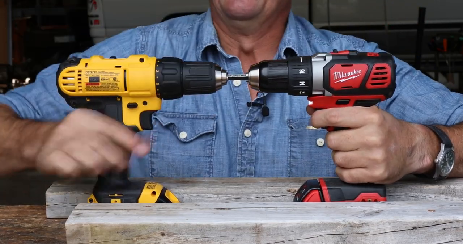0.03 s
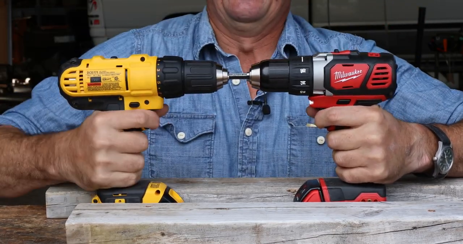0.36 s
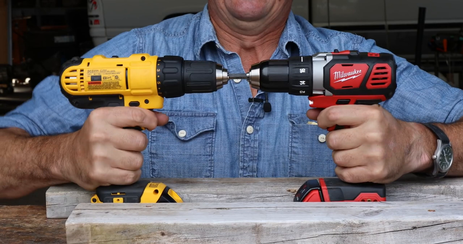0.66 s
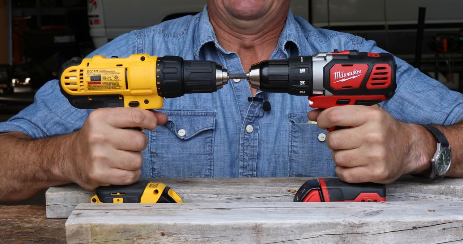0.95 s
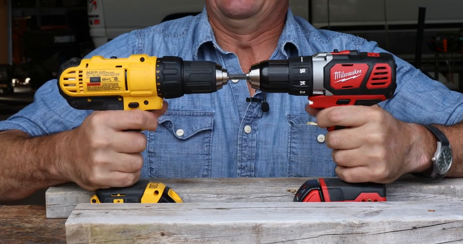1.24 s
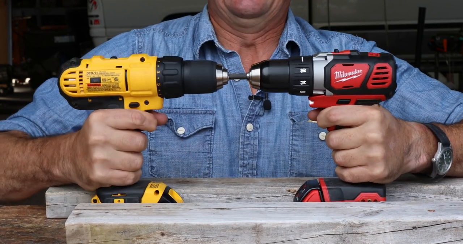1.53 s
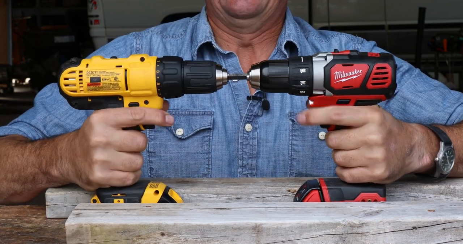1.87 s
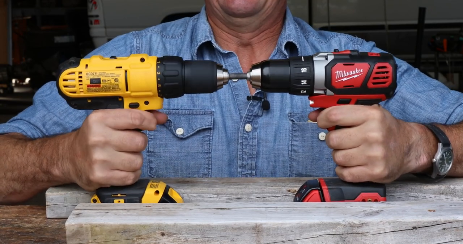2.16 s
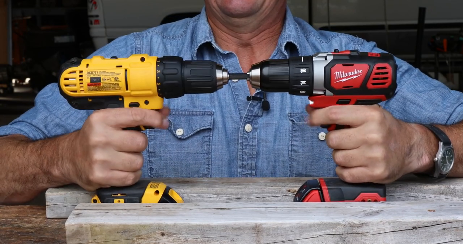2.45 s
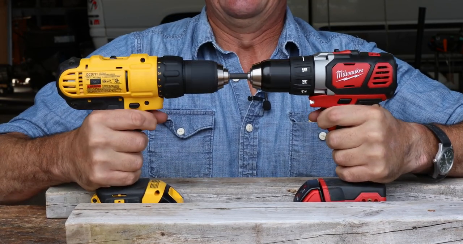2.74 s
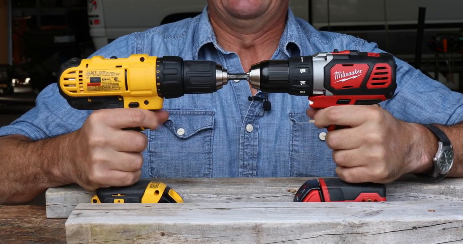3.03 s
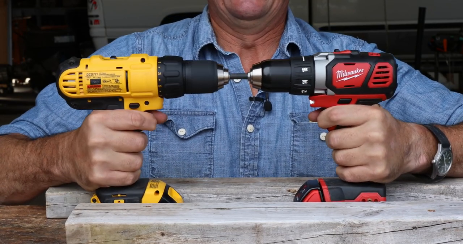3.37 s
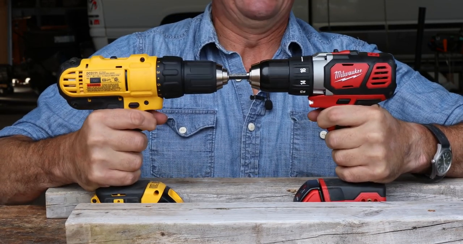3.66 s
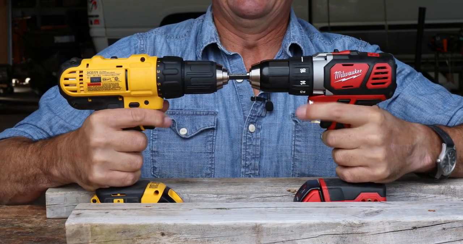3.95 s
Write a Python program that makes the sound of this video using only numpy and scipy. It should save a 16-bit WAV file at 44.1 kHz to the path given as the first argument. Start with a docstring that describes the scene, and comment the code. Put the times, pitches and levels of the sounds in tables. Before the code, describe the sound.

Close up in a workshop, cordless drills rev and stop five times after a soft handling rustle. Each burst growls and hisses with a fast ratcheting clutch rattle, surrounded by light trigger ticks, hollow knocks and a brief room ring.

```python
"""Two cordless drills, joined chuck to chuck, fight each other in five short bursts in a workshop.
Their gears grind up to speed and a slipping clutch snaps over its teeth, faster and then slower.
Triggers tick, speed controls whine, and hands and chucks (the jaws that hold a bit) knock.
The room rings on after each burst, over faint hums and the rustle of handling."""
import sys
import numpy as np
from scipy import signal
from scipy.fft import rfft, irfft
from scipy.io import wavfile

SR = 44100
rng = np.random.default_rng(int(sys.argv[2]) if len(sys.argv) > 2 else 0)


def wav_out(sig):
    """Save sig, one row per channel (or a flat mono array), as 16-bit PCM at SR to the path in sys.argv[1]."""
    wavfile.write(sys.argv[1], SR, np.round(np.clip(np.atleast_2d(sig).T, -1, 1) * 32767).astype(np.int16))


N = 176400
T = np.arange(N) / SR


def motors():
    """Gears grind and growl, brushes hiss and the drill bodies shudder, all louder with speed."""
    # motor speed, one list per burst: (time [s], speed [clutch teeth per s])
    bursts = [
        [(.535, 0.86), (.56, 7.7), (.6, 9.8), (.645, 3.9), (.675, 12.3), (.695, 29), (.745, 31.6), (.765, 13.4),
         (.785, 1.2)],
        [(1.408, 1.93), (1.445, 14.9), (1.483, 14.8), (1.497, 28.2), (1.57, 47.7), (1.645, 48.4), (1.69, 23.2),
         (1.712, 12), (1.745, 1.4)],
        [(2.135, 2.1), (2.155, 12.1), (2.19, 19.4), (2.23, 38.5), (2.29, 49.4), (2.365, 41.3), (2.398, 22),
         (2.425, 4.8)],
        [(2.765, 1.8), (2.795, 13.7), (2.83, 15), (2.845, 30), (2.9, 40.8), (2.95, 49), (2.987, 30.7),
         (3.01, 15.1), (3.035, 0.72)],
        [(3.36, 0.98), (3.398, 6.37), (3.41, 24.4), (3.46, 32.8), (3.53, 51), (3.69, 56.2), (3.745, 39),
         (3.778, 24.1), (3.805, 1.95)],
    ]
    speed = sum(np.interp(T, *np.transpose(burst), left=0, right=0) for burst in bursts).clip(0)
    effort = speed / 50  # 1 is about full speed
    gears = (gear_grind(effort) + gear_growl(speed, effort)) * effort ** 1.076
    hiss = brushes(effort)
    shaking = shudder(effort)
    sticking = from_db(2.54 * drift(67) * np.clip(1 - effort, 0, 1))  # slow gears move in fits
    return room_and_shell_rings(gears * sticking + shaking) + hiss * sticking


def gear_grind(effort):
    """Gear teeth make countless tiny hits. Slow teeth meet softly, so the treble comes in with speed."""
    # tone of the grinding: (frequency [Hz], level [dB])
    gear_colour = [(47, -35.5), (80, -24.5), (98, -36.5), (130, -13), (328, -8), (391, -1), (649, -3),
                   (1400, -3), (1910, -8), (2900, -7), (5620, -20), (7010, -18.5), (15500, -29)]
    grind = coloured(grains(4500, spread_db=3), gear_colour) * from_db(-29.5 + drift(280))
    dull = signal.sosfilt(signal.butter(1, 2540, fs=SR, output="sos"), grind)
    return dull + (grind - dull) * effort ** .36


def gear_growl(speed, effort):
    """Teeth strike in an uneven rhythm and ring the gearbox; the pitch rises with speed."""
    # gearbox rings at full speed: (frequency [Hz], width [Hz], level [dB])
    rings = [(433, 200, -3), (616, 214, 0.5)]
    teeth_passed = np.cumsum(speed * 7 * (1 + .06 * drift(60))) / SR  # 7 gear teeth per clutch tooth
    hits = np.diff(np.floor(teeth_passed), prepend=0) * (1 + 1.94 * rng.standard_normal(N))
    bend = 1 + .16 * (effort - 1) + .06 * drift(5.9)
    growl = sum(from_db(db - 39) * gliding_ring(hits, hz * bend, width) for hz, width, db in rings)
    return growl * effort ** .5


def brushes(effort):
    """The brushes, sliding contacts inside the motor, hiss as it spins."""
    # tone of the hiss: (frequency [Hz], level [dB])
    brush_colour = [(3000, -39.5), (5800, -8.5), (7300, 3), (10000, 3.5), (12500, -1), (15500, -1)]
    hiss = coloured(grains(14000, spread_db=6.5), brush_colour)
    return hiss * from_db(-38.5 + drift(120)) * effort ** 1.97


def shudder(effort):
    """The drill bodies shake with a low rumble."""
    return from_db(-68.5) * rms_one(noise_band(30, 108.5, N)) * effort ** .34


def clutch():
    """Each slip over a tooth is one hard crack inside a brief rattle of steel balls finding their seats."""
    # clutch snaps: (time [s], level [dB])
    snaps = [(0.657, -26), (0.6879, -14.5), (0.7248, -8), (.7596, -11.5), (1.4925, -12), (1.5254, -10),
             (1.5523, -22), (1.5755, -10.5), (1.598, -11), (1.6208, -13), (1.6385, -10), (1.664, -10.5),
             (1.6917, -25), (1.7074, -11), (2.1458, -24), (2.2, -15), (2.2324, -10.5), (2.249, -16),
             (2.2623, -16), (2.286, -6.5), (2.3025, -12.5), (2.3214, -17), (2.3446, -10.5), (2.3681, -9),
             (2.4083, -9.5), (2.796, -18.5), (2.8379, -14), (2.8702, -12.5), (2.8973, -15), (2.9214, -10.5),
             (2.9426, -9.5), (2.9658, -17), (2.9959, -9.5), (3.4039, -20), (3.4684, -15.5), (3.4929, -11),
             (3.5169, -20), (3.5398, -11.5), (3.5596, -10.5), (3.5827, -13), (3.5996, -10.5), (3.6191, -11),
             (3.637, -14), (3.6555, -17), (3.6754, -9.5), (3.695, -15), (3.7112, -15.5), (3.7283, -9.5),
             (3.752, -10), (3.7849, -10.5)]
    # tone of a snap: (frequency [Hz], level [dB])
    snap_colour = [(24, -44.5), (40, -27), (143, -13), (522, 5), (817, 1.5), (2270, -7.5), (2920, -7),
                   (5300, -23.5), (8110, -17), (10400, -24.5), (15500, -32)]
    rattle_level = blows([(s - .0016, db) for s, db in snaps], hold_s=.0032, decay_s=.0014)
    contacts = grains(14000, spread_db=3.4) * rattle_level
    for s, db in snaps:
        contacts[int(s * SR)] += from_db(db + 16.5) * rng.choice([-1, 1])  # the crack
    return from_db(-12) * room_and_shell_rings(coloured(contacts, snap_colour))


def room_and_shell_rings(x):
    """A low room resonance at 106 Hz and the higher rings of the plastic shells colour the sound."""
    # the room's resonance, then the shells' rings: (frequency [Hz], width [Hz], level [dB])
    rings = [(106, 8, 8), (390, 45, -13), (670, 45, -5), (1168, 30, -8), (1925, 110, -4), (2900, 380, -13),
             (3900, 200, -9)]
    return x + sum(from_db(db) * np.pi * width / SR * resonance(x, hz, width) for hz, width, db in rings)


def knocks():
    """Grips and chucks knock: a short hollow ring, a weaker lower tone and a clack of plastic."""
    # knocks: (time [s], level [dB], ring pitch [Hz], clack level offset [dB])
    hits = [(0.1399, -24, 690, -30), (.228, -24, 545, -4), (0.2366, -28, 296, -14),
            (0.3269, -19.5, 713, -14), (.576, -38, 440, 3), (.611, -28, 570, -8.5), (0.87, -40, 413, -6),
            (1.252, -32, 596, -2), (1.268, -33.5, 445, -16), (1.369, -39.5, 650, -14),
            (1.458, -19, 830, -11), (1.724, -28, 590, 0.5), (2.809, -15.5, 852.3, -3),
            (3.003, -22, 525, -5), (3.374, -34, 597.3, -7), (3.426, -9, 859.5, -12.5),
            (3.436, -16.5, 651, 0)]
    # tone of a clack: (frequency [Hz], level [dB])
    clack_colour = [(24, -40.5), (45, -17), (653, -7.5), (2200, -22), (2940, -34.5), (15600, -48)]
    fade_s, attack_s = .031, .00093
    rings = np.zeros(N)
    for s, db, hz, _ in hits:
        age = np.maximum(T - s, 0)
        tones = np.sin(2 * np.pi * hz * age) + .5 * np.sin(2 * np.pi * hz * .742 * age)
        level = from_db(db - 60 * np.minimum(age / fade_s, 2)) * (1 - np.exp(-age / attack_s))
        rings += level * tones
    clack_level = blows([(s, db + clack) for s, db, _, clack in hits], hold_s=.00057, decay_s=.0048)
    return rings + from_db(-2.5) * coloured(clack_level * grains(7900, spread_db=-1.5), clack_colour)


def ticks():
    """Triggers and loose chuck parts click brightly, each inside a short scrape of plastic."""
    # clicks: (time [s], level [dB])
    hits = [(0.227, -31.5), (0.3282, -51), (0.461, -43), (0.5997, -27), (0.655, -25), (0.9537, -40),
            (1.2464, -33.5), (1.2842, -31.5), (1.3023, -41.5), (1.378, -33.5), (1.384, -39.5),
            (1.4497, -26), (1.767, -34), (1.928, -39), (1.9457, -33.5), (2.0865, -32), (2.144, -24),
            (2.4077, -20.5), (2.59, -31.5), (2.7259, -31), (2.7666, -31.5), (2.995, -14), (3.1936, -39),
            (3.2135, -33), (3.3344, -31.5)]
    # tone of a tick: (frequency [Hz], level [dB])
    tick_colour = [(200, -2), (900, 12.5), (2400, 5), (3600, 8.5), (5200, -2.5), (7000, -5), (11000, -8),
                   (15500, -10)]
    click = grains(16000, spread_db=1) * blows(hits, hold_s=.0017, decay_s=.0015)
    scrape_level = blows([(s - .0098, db - 16) for s, db in hits], hold_s=.0014, decay_s=.013)
    scrape = grains(5000, spread_db=2.5) * scrape_level
    return from_db(-12) * coloured(click + scrape, tick_colour)


def whine():
    """While a motor is stalled, its speed control switches rapidly: a high tone and a louder octave."""
    # whines: (start [s], length [s], level [dB])
    stalls = [(.53, .2, -62), (1.39, .11, -65), (2.1, .1, -65.5), (2.74, .09, -66), (3.345, .08, -66)]
    switch_hz, octave_db = 7870, 14
    phase = 2 * np.pi * np.cumsum(switch_hz * (1 + .004 * drift(200))) / SR
    level = swells(stalls) * from_db(3 * drift(60))
    return level * (np.sin(phase) + from_db(octave_db) * np.sin(2 * phase))


def hums():
    """Faint wavering tones come and go between the bursts."""
    # hums: (start [s], length [s], pitch [Hz], level [dB])
    tones = [(.85, .15, 205, -53), (2.69, .1, 211, -43), (1.0, .42, 1112, -70)]
    waver = .5 * drift(22)
    return sum(swells([(s, length, db)]) * np.sin(2 * np.pi * hz * T + waver) for s, length, hz, db in tones)


def rubs():
    """Sleeve and fingers scratch in short strokes as the hand reaches for the grip."""
    # strokes: (start [s], length [s], level [dB])
    strokes = [(-.03, 0.11, -57.5), (0.022, 0.1, -54), (0.104, 0.023, -51.5), (0.118, 0.036, -50.5),
               (0.188, 0.03, -63)]
    # tone of the scratching: (frequency [Hz], level [dB])
    rub_colour = [(900, 1), (1650, 5.5), (3200, -9.5), (5500, -24.5), (9000, -15.5), (15500, -26)]
    return swells(strokes) * coloured(grains(3000, spread_db=-3), rub_colour)


def workshop(x):
    """The walls return a wash of echoes that dies faster in the treble."""
    # how long the room rings: (frequency [Hz], time to fade by 60 dB [s])
    fade_times = [(100, 1), (400, 0.63), (2200, 0.78), (4500, 0.58), (10000, 0.29)]
    t, edges_hz, tail = T[:SR], np.geomspace(50, 17000, 25), 0
    for low, high in zip(edges_hz, edges_hz[1:]):
        fade_s = at_hz(fade_times, np.sqrt(low * high))
        tail += noise_band(low, high, SR) * from_db(-60 * t / fade_s)
    tail *= 1 - np.exp(-t / .0055)  # echoes take a moment to build
    tail *= 1 + 2.63 * np.exp(-t / .029)  # early ones are stronger
    tail = signal.sosfilt(signal.butter(1, 9100, fs=SR, output="sos"), tail)
    return from_db(-18) * signal.fftconvolve(x, tail / np.linalg.norm(tail))[:N]


def background():
    """Hands rustle softly over the still air of the room."""
    # loudness of the rustle: (time [s], level [dB])
    rustle_levels = [(0, -54.5), (.45, -62.5), (.9, -52), (1.15, -84.5), (1.34, -71), (1.85, -58.5),
                     (2.68, -57), (3.28, -61.5), (4, -58.5)]
    # tone of the rustle: (frequency [Hz], level [dB])
    rustle_colour = [(24, -17), (40, -7), (417, 3), (1130, -12.5), (2300, -18.5), (15500, -59.5)]
    # tone of the air: (frequency [Hz], level [dB])
    air_colour = [(25, -16.5), (70, 7), (330, 1.5), (800, -6.5), (2500, -16.5), (15500, -23)]
    rustle = coloured(grains(6000, spread_db=-5.5), rustle_colour)
    rustle *= from_db(np.interp(T, *np.transpose(rustle_levels)) + 3.7 * drift(26))
    return rustle + from_db(-71.5) * coloured(rng.standard_normal(N), air_colour)


def from_db(db):
    """Turn decibels into a multiplier."""
    return 10 ** (np.asarray(db) / 20)


def rms_one(x):
    """Scale a signal so its typical size (rms) is 1."""
    return x / np.sqrt(np.mean(x ** 2) + 1e-20)


def at_hz(points, hz):
    """Read between a table's rows, with octaves evenly spaced."""
    frequencies, values = np.transpose(points)
    return np.interp(np.log(np.maximum(hz, 1)), np.log(frequencies), values)


def coloured(x, spectrum, size=4096):
    """Give a sound the tone in a table; plain noise keeps its power."""
    gains = from_db(at_hz(spectrum, np.arange(size // 2 + 1) * SR / size))
    cepstrum = irfft(np.log(gains))
    cepstrum[1:size // 2] *= 2  # folded so the filter rings only after a hit
    cepstrum[size // 2 + 1:] = 0
    response = irfft(np.exp(rfft(cepstrum)))
    return signal.fftconvolve(x, response / np.linalg.norm(response))[:N]


def noise_band(low_hz, high_hz, samples):
    """Noise between two frequencies."""
    band = signal.butter(2, [low_hz, high_hz], "band", fs=SR, output="sos")
    return signal.sosfilt(band, rng.standard_normal(samples))


def drift(rate_hz):
    """A smooth random wobble of typical size 1."""
    r = np.exp(-2 * np.pi * rate_hz / SR)
    smoothing = [[1, .011, .011, 1, -2 * r, r * r]]
    return rms_one(signal.sosfilt(smoothing, rng.standard_normal(N + SR))[SR:])


def resonance(x, hz, width_hz):
    """Ring at one pitch; a narrower width rings longer."""
    r = np.exp(-np.pi * width_hz / SR)
    return signal.lfilter([1, 0, -1], [1, -2 * r * np.cos(2 * np.pi * hz / SR), r * r], x)


def gliding_ring(x, hz, width_hz):
    """Ring at a moving pitch, with typical size 1."""
    turn = np.exp(2j * np.pi * np.cumsum(hz) / SR)
    r = np.exp(-np.pi * width_hz / SR)
    return rms_one(np.real(signal.lfilter([1], [1, -2 * r, r * r], x / turn) * turn))


def grains(per_s, spread_db):
    """Tiny hits of uneven size at random times."""
    sizes = from_db(spread_db * np.minimum(rng.exponential(1, N), 4)) * rng.choice([-1, 1], N)
    return rms_one(sizes * (rng.random(N) < per_s / SR))


def blows(rows, hold_s, decay_s):
    """Loudness that jumps up, holds and fades for each (time [s], level [dB])."""
    out = np.zeros(N + SR)
    shape = np.exp(-np.maximum(T[:SR // 10] - hold_s, 0) / decay_s)
    for s, db in rows:
        out[int(s * SR):int(s * SR) + len(shape)] += from_db(db) * shape
    return out[:N]


def swells(rows):
    """Loudness that rises and falls smoothly for each (start [s], length [s], level [dB])."""
    return sum(from_db(db) * np.sin(np.pi * np.clip((T - s) / length, 0, 1)) ** 2 for s, length, db in rows)


def scene():
    """The drills up close, with the room behind them."""
    drills = motors() + clutch() + knocks() + ticks()
    return (drills + workshop(drills) + whine() + hums() + rubs() + background())[None]


def record(dry):
    """Round off the loudest peaks and cut the highest treble."""
    peak_limit, cutoff_hz = .7, 15950
    rounded = peak_limit * np.tanh(dry / peak_limit)
    return signal.sosfilt(signal.ellip(12, .1, 80, cutoff_hz, fs=SR, output="sos"), rounded)


dry = scene()
out = record(dry)
wav_out(out)
```